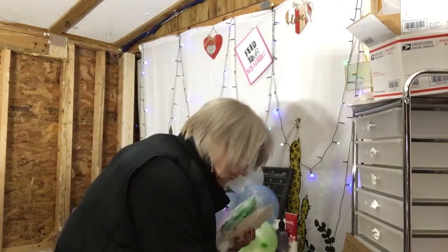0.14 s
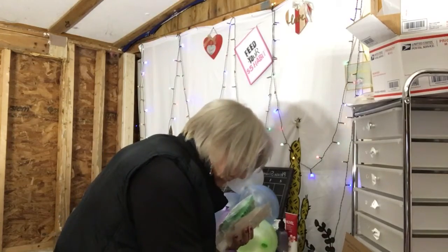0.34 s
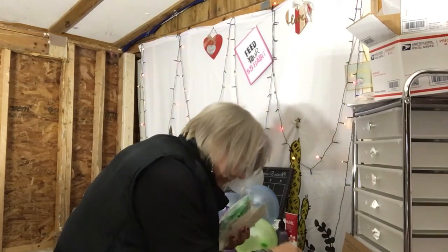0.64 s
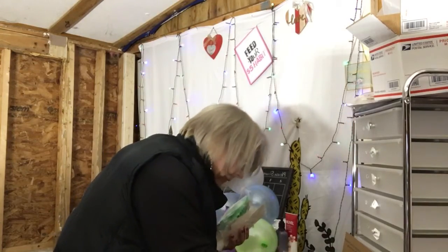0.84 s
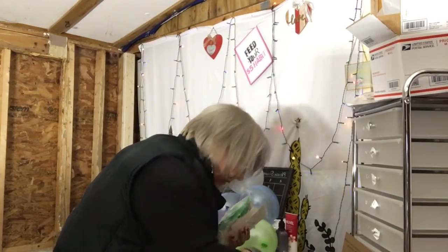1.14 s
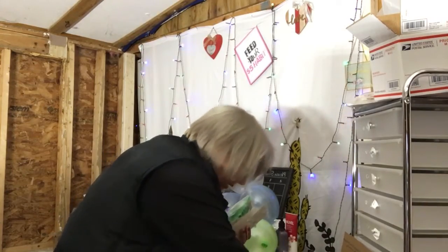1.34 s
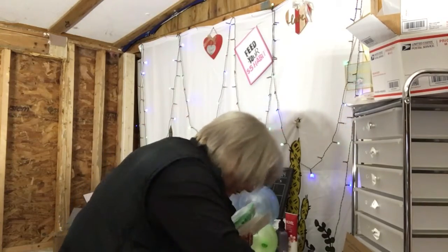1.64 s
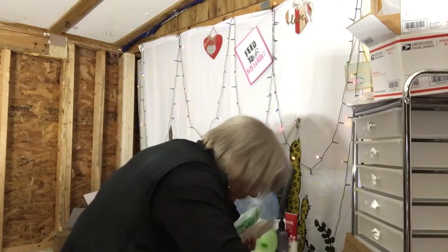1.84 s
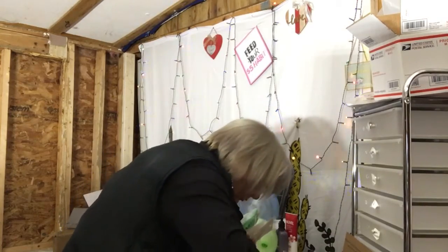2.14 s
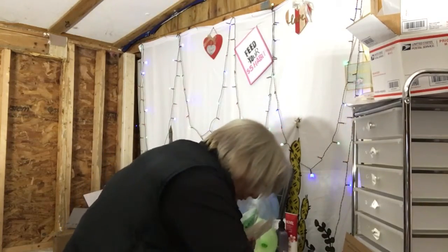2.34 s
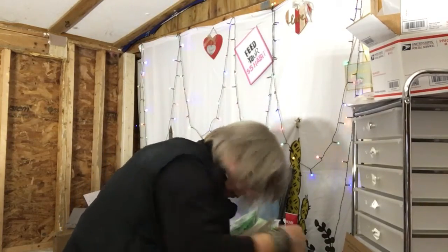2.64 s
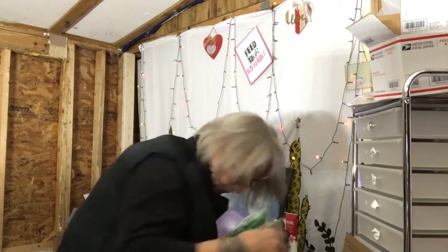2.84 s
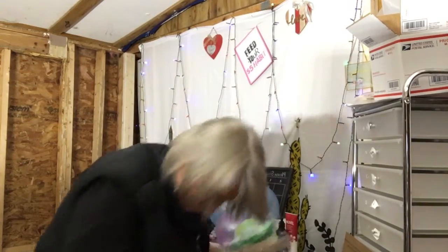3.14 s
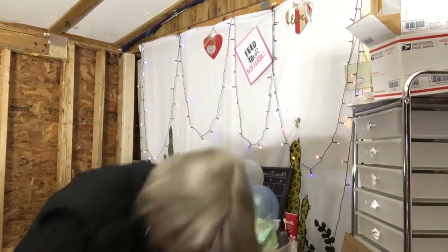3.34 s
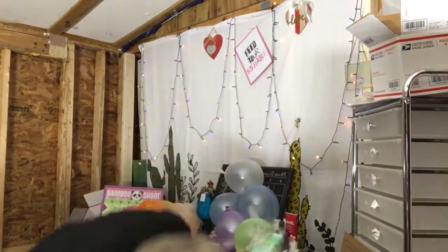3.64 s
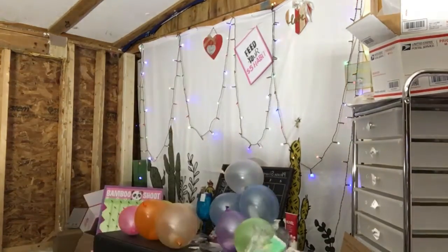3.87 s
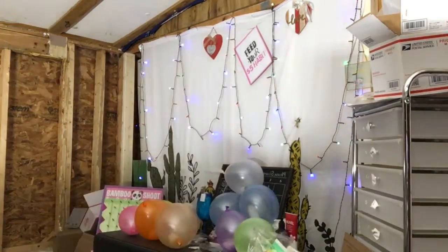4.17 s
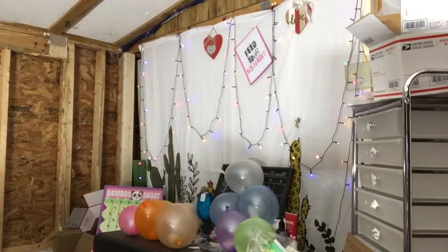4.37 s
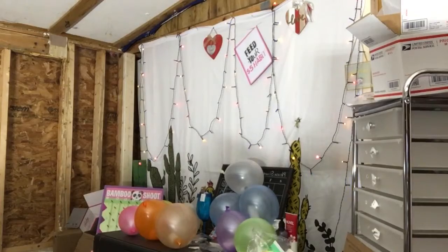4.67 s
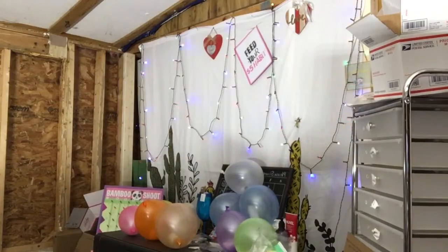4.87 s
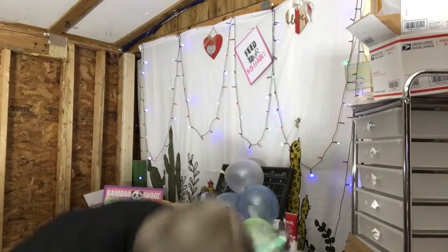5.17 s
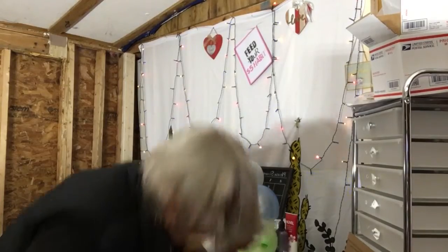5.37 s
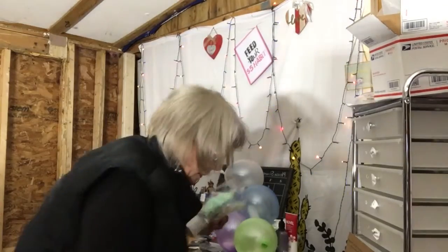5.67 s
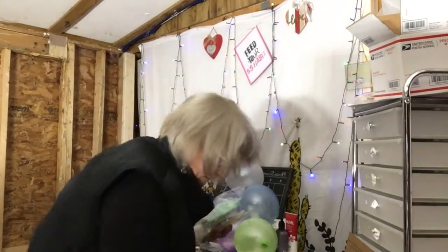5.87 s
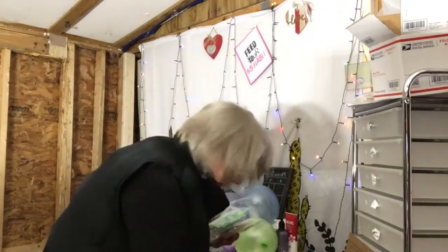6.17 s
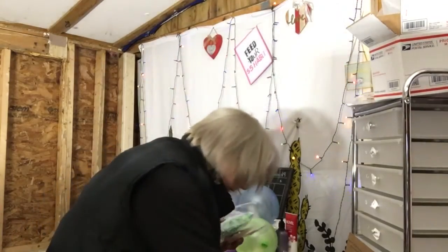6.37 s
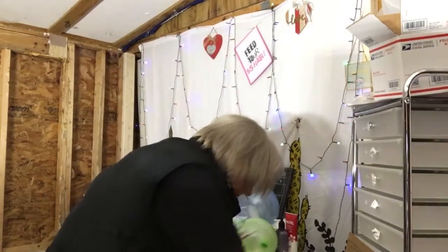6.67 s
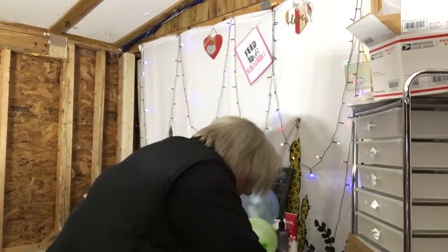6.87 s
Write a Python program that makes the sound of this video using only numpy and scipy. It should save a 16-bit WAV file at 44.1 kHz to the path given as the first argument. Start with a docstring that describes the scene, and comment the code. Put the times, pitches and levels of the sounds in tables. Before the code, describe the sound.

Small plastic packets of hard trinkets are handled on a table. Soft rustles begin, a dull knock and dragging rumble follow, then crisp snapping grows dense and a loud crush lands with clattering beads. It eases to faint creases and a barely audible low hum, picks up with scattered sharp crackles, nearly stops, and resumes vigorously. The miking is close, in a tight, lightly reflective room; bumps reach it through the stand.

```python
"""Small plastic bags crinkle and snap as hands rummage in them on a table in a wooden shed: random creases
drive the film's bright and dull colours. Rumble, a short hum and faint hiss lie beneath, made of filtered
noise and a gliding sine. Bags drop and push the table's modes into a thud; beads and trinkets clack as
clusters of touches ring short partials, and thin metal parts tink on single modes.
Bags, trinkets and tinks get dense, short-lived echoes with a bright wall echo among them."""
import sys
import numpy as np
from scipy import signal
from scipy.fft import rfft, irfft
from scipy.io import wavfile

SR = 44100
rng = np.random.default_rng(int(sys.argv[2]) if len(sys.argv) > 2 else 0)


def to_linear_factor(level_db):
    """Convert decibel levels (scalar or array-like) to linear amplitude factors."""
    exponent = np.asarray(level_db, float) / 20
    return 10 ** exponent


def store_pcm(level_fs):
    """Save levels as 16-bit WAV."""
    pcm = np.round(np.clip(level_fs, -1, 1) * 32767).astype(np.int16)
    wavfile.write(sys.argv[1], SR, np.atleast_2d(pcm).T)


N = 309141  # length in samples

# Strokes of the hands through the bags, and the near-still rests between them.
# Each row: start in seconds, length in seconds, crinkle at the start in dB, crinkle at the end in dB.
STROKES = [(0.0, 0.11, -55.5, -54.5), (.25, 0.15, -46, -41), (.54, 0.29, -65, -67), (.79, 0.022, -63, -61),
           (.87, 0.067, -52.5, -54.5), (1.05, 0.16, -79, -69), (1.29, 0.14, -38.5, -40),
           (1.52, 0.19, -32.5, -41.5), (1.72, 0.36, -53.5, -37.5), (2.05, .13, -55, -34.5),
           (2.22, 0.077, -44, -34.5), (2.36, 0.23, -39.5, -55.5), (2.66, 0.077, -39.5, -45.5),
           (2.88, .08, -41, -41.5), (2.98, 0.18, -57, -45), (3.22, 0.24, -54.5, -64),
           (3.5, .36, -55.5, -49), (3.9, 0.19, -44, -51.5), (4.09, 0.017, -36, -41),
           (4.14, 0.12, -46, -45.5), (4.31, 0.13, -41, -36.5), (4.5, 0.15, -47.5, -46),
           (4.69, 0.038, -60, -43.5), (4.78, 0.11, -43, -49.5), (4.92, 0.49, -53, -61.5),
           (5.53, 0.054, -39, -62), (5.7, 0.083, -51, -51), (5.93, 0.37, -38, -34.5),
           (6.3, 0.18, -34.5, -36), (6.5, 0.11, -53, -49.5), (6.68, .08, -69, -64),
           (6.8, 0.12, -48.5, -36.5), (6.94, 0.08, -41.5, -32.5)]
STROKE_RISE_DB_PER_S, STROKE_FALL_DB_PER_S = 361, 250.0
# The harder the stroke, the brighter: dull body relative to a -50 dB crinkle, and its change per dB.
BODY_DB, BODY_SLOPE = -6, -0.27

# Sudden grips that crush a bag.
# Each row: start in seconds, crinkle in dB, duller body relative to it in dB, dying time t60 in seconds.
GRIPS = [(0.1, -44, -24, .17), (0.1746, -37.5, -12, .086), (0.23, -35.5, -15, 0.23),
         (.285, -47.5, -3, 0.064), (.345, -39.5, -15, 0.23), (0.498, -49, -20, 0.21),
         (0.758, -43, -10, 0.17), (1.212, -42.5, -11, 1), (1.31, -33.5, -29, 0.13), (1.328, -43, -2, 0.3),
         (1.538, -38, -21, .097), (1.82, -50, -18, .13), (1.872, -41, -28, .13), (1.9769, -42, -22, 0.15),
         (2.043, -36, -4.5, 0.046), (2.358, -45, -24, 0.15), (2.6089, -21, -12, 0.12),
         (2.8383, -28.5, -16, 0.1), (2.893, -35.5, -5, 0.15), (2.951, -44.5, -6, .13),
         (3.04, -46, 2.5, 0.26), (3.1, -34, -5, 0.092), (3.198, -37, -10, 0.094), (3.409, -55.5, 5.5, 0.16),
         (4.073, -47, -12, .13), (4.199, -40, -7.5, 0.13), (4.337, -46, -9, 0.15),
         (4.452, -30.5, -33, 0.38), (4.5094, -38, -11, 0.1), (4.61, -33, -35, 0.091),
         (4.669, -34.5, -16.5, 0.15), (4.72, -33, -24, 0.17), (4.89, -55, -34, 0.16), (5.101, -58, 4, 0.43),
         (5.472, -34, -9, 0.45), (5.5418, -36, -11, 0.16), (5.642, -47.5, -0.5, 0.22), (5.68, -34, -9, .1),
         (5.776, -49, -17, .13), (5.86, -45.5, -7, 0.38), (5.916, -45, -2, 0.082),
         (6.056, -31.5, -15, 0.058), (6.165, -35.5, -27, .1), (6.206, -33, -17, .08),
         (6.274, -28.5, -12.5, 0.031), (6.582, -52.5, -1, .13), (6.7548, -36.5, -9, 0.44),
         (6.91, -43, -6, .13)]
GRIP_RISE_S, GRIP_HOLD_S = 0.0051, 0.011

# The clearest single creases that snap. Each row: start in seconds, strength in dB.
SNAPS = [(.0181, -16), (.0356, -19), (.095, -25), (.0992, -10.5), (.1784, -16), (.2092, -16), (.2491, -10),
         (.2535, -12), (.4996, -24), (.5054, -17.5), (.7991, -18), (1.3104, -11), (1.829, -15.5),
         (1.9334, -9), (2.0456, -11), (2.119, -8), (2.1702, -11), (2.218, -11.5), (2.3227, -5),
         (2.3647, -3), (2.3813, -8.5), (2.403, -13), (2.4542, -9.5), (2.6194, -3), (2.8408, -18),
         (3.4339, -25), (3.4937, -24), (3.5525, -20), (3.7498, -25), (3.826, -31), (3.84, -21),
         (3.8786, -17.5), (3.894, -22), (3.966, -16), (4.198, -9), (4.89, -20), (4.895, -13), (5.0974, -20),
         (5.4717, -10), (5.5426, -10), (5.5648, -6), (5.6924, -7), (5.8672, -15.5), (5.9203, -10),
         (6.0032, -7), (6.07, -6), (6.091, -5.5), (6.1636, -4), (6.2119, -4), (6.2901, -19), (6.384, -12),
         (6.549, -14), (6.5896, -16), (6.804, -6), (6.9195, -10)]
SNAP_BODY_DB = -25.5  # relative to the snap
# Lesser snaps come at random: how often, strength above the stroke's crinkle, spread.
STRAY_SNAPS_PER_S, STRAY_SNAP_DB, STRAY_SPREAD_DB = 25.0, 17, 6.5

# Creases of different size favour different pitches. Each entry: pitch in Hz.
EDGE_TINTS_HZ = [6100, 6600, 9200, 8900, 10800, 10500, 13400, 13300, 14400, 15100]
BODY_TINTS_HZ = [830, 1180, 1280, 1880, 2390, 2940, 3000, 3700, 4650, 5850, 6140]
# Colour of the film's bright edge. Each row: frequency in Hz, relative level in dB per Hz.
FILM_EDGE = [(2350, -48), (4000, -16), (7640, -13.5), (8810, -6.5), (10100, -5.5), (11300, 4),
             (12100, -0.5), (15700, -20)]
# Colour of the film's duller body. Each row: frequency in Hz, relative level in dB per Hz.
FILM_BODY = [(240, -0.5), (400, -4), (817, -5), (926, -3), (1010, 0), (1090, 0), (2280, 2), (4670, 1.5),
             (8000, -1), (10400, 6.5), (17600, -120)]

# Bags and arms dragged over the table make it rumble.
# Each row: start in seconds, length in seconds, level at the start in dB, level at the end in dB.
DRAGS = [(0.0, .45, -68, -62), (1.34, 0.27, -45.5, -54), (1.62, 0.13, -49, -59), (1.9, 0.6, -56, -64.5),
         (3.71, 0.63, -50.5, -54.5), (5.0, 0.29, -65, -58.5), (6.02, 0.44, -64, -52),
         (6.8, 0.31, -45.5, -54.5)]
DRAG_RISE_DB_PER_S, DRAG_FALL_DB_PER_S, TABLE_REST_DB = 250.0, 133, -71.5
# Colour of the table rumble. Each row: frequency in Hz, relative level in dB per Hz.
RUMBLE = [(53, -8), (90, -28), (102, -24), (119, -35), (135, 4.5), (179, 2), (284, -4), (361, 3), (452, -4),
          (480, -5.5), (700, -8), (910, -12), (1540, -120)]
# Weight comes down on the floor boards.
# Each row: start in seconds, length in seconds, level at the start in dB, level at the end in dB.
TREADS = [(.45, .12, -65, -70), (1.34, .1, -64, -60), (2.92, .02, -58, -62), (3.21, 0.04, -49, -54.5),
          (3.7, .65, -71, -61), (5.2, .03, -68, -63), (6.42, 0.14, -49, -51.5)]
TREAD_RISE_DB_PER_S, TREAD_FALL_DB_PER_S, FLOOR_REST_DB = 200.0, 120.0, -75
# Something slides over the table and hums, its pitch rising.
SLIDE_S, SLIDE_LENGTH_S, SLIDE_START_HZ, SLIDE_END_HZ, SLIDE_DB = 3.74, 0.265, 177, 186.6, -54.5

# Colour of the room hiss. Each row: frequency in Hz, relative level in dB per Hz.
HISS = [(18, -36), (30, -51), (121, 5), (252, -12), (295, 14), (336, -16), (449, -51), (616, -3), (702, -7),
        (1540, -5.5), (7090, -43), (11400, -10), (16000, -24)]
HISS_DB = -69

SHED_T60_S, SHED_DB, WALL_CUT_HZ = 0.32, -9, 16600
WALL_ECHO_S, WALL_ECHO_DB = 0.0054, -7

# Blows on the table.
# Each row: start in seconds, strength in dB, extra on the deep modes in dB, extra on the upper modes in dB.
THUDS = [(0.237, -67, -29, 17), (1.216, -25.5, -27, -13), (1.244, -38, -30, -15), (1.337, -33.5, -17, -11),
         (1.381, -44, -9, 1.5), (2.172, -38.5, -14, -4.5), (2.61, -37, -14, -35), (2.85, -56, -40, 5),
         (2.918, -45, -14, -20), (3.147, -41.5, -20, -24), (3.22, -51.5, 0, -13), (3.434, -54, -26, 17),
         (3.593, -51.5, -17, 5), (3.703, -44, -31, -15), (3.759, -56, -27, 10), (3.9, -35, -33, -14),
         (4.019, -37.5, -35, -10), (4.09, -45, -34, 2.5), (4.267, -43, -26, -27), (4.488, -50.5, -19, -23),
         (5.54, -47.5, -32, -26), (5.861, -55, -3, -1), (6, -46.5, -32, -5), (6.303, -38, -22, -3.5),
         (6.339, -39.5, -14, -19), (6.435, -34, -1, -11), (6.459, -46.5, 6, -6), (6.765, -36.5, -11, 0),
         (6.897, -41.5, -28, -17)]
# Modes of table top and floor. Each row: frequency in Hz, relative level in dB, t60 in seconds.
TABLE_MODES = [(46.5, 2, 0.56), (71.7, 4, 0.19), (133.6, 1.5, 0.29), (202, -0.5, 0.12), (260.3, 0, 0.14),
               (325, 8, 0.05), (368.3, -0.5, 0.19), (465, -36, 0.048), (600, -10, 0.17), (784, -9.5, 0.072),
               (1130, -6, 0.12)]
CONTACT_S = 0.0048

# Hard pieces that clack. Each row: start in seconds, first touch in dB, nominal pitch in Hz,
# clatter after it relative to the touch in dB, t60 of the clatter in seconds.
CLACKS = [(.292, -54, 2930, -17, .066), (1.21, -46.5, 604, -2, 0.021), (1.339, -57, 1200, 12, 0.066),
          (2.055, -55, 1890, 2, 0.11), (2.171, -30.5, 2460, -3.5, 0.072), (2.613, -33.5, 2620, -1.5, 0.072),
          (2.617, -38, 3350, -15, 0.11), (2.716, -32, 5300, -12, .04), (2.850, -40.5, 2430, -5, 0.083),
          (2.894, -45, 5250, -3, 0.13), (2.969, -48.5, 2460, 2, 0.13), (3.051, -56, 1260, -5, 0.34),
          (3.106, -45.5, 2800, 0, 0.07), (3.207, -45, 2550, 4, 0.025), (3.421, -49.5, 573, -6.5, 0.23),
          (3.426, -57.5, 1850, 0, 0.14), (3.893, -31, 1490, -12, 0.13), (3.94, -60.5, 770, 6, .28),
          (4.093, -55, 1940, 0.5, 0.2), (4.16, -43.5, 4400, -1, 0.062), (4.461, -40.5, 3000, -3, 0.17),
          (5.549, -39.5, 3700, -6.5, 0.059), (5.997, -45.5, 4300, 2, .06), (6.291, -57, 607, -8, 0.048),
          (6.382, -50, 3000, -8, .06), (6.565, -53, 3740, 3, .051), (6.763, -58, 420, 3, .05)]
# Partials of a hard piece, before chance and contact damping.
# Each row: multiple of the pitch, relative level in dB, t60 in cycles of ringing.
CLACK_PARTIALS = [(.5, -43, 15), (.7, -46, 12), (.87, -32, 14), (1.002, 1.6, 74), (1.13, -3, 16),
                  (1.26, 3.5, 33), (1.5, -5.5, 50), (1.8, -0.5, 18), (2.3, -1, 32)]
CLATTER_RISE_CYCLES = 8.9  # big, low pieces gather their clatter more slowly

# Thin metal parts that ring on a single pitch.
# Each row: start in seconds, peak in dB, frequency in Hz, t60 in seconds.
TINKS = [(1.884, -26.5, 9950, 0.053), (1.905, -40, 9800, .06), (2.17, -41, 2970, 0.15),
         (2.218, -27, 8900, 0.016), (2.62, -21.5, 5200, 0.025), (2.621, -27, 6150, 0.037)]

LOW_CUT_HZ, TOP_HZ = 60.3, 15950


def rms_one(x):
    """Scale to rms 1."""
    return x / np.sqrt(np.mean(x ** 2) + 1e-20)


def add(out, s, sound):
    """Mix a short sound in at time s."""
    at = max(round(s * SR), 0)
    out[at:at + len(sound)] += sound[:N - at]


def colour(x, spectrum):
    """Causal (minimum-phase) filter with the given spectrum; white noise of rms 1 stays rms 1."""
    hz, level_db = np.transpose(spectrum)
    grid = np.fft.rfftfreq(4096, 1 / SR) + 1  # 1 Hz up, so that the log exists
    cepstrum = irfft(np.log(to_linear_factor(np.interp(np.log(grid), np.log(hz), level_db))))
    # folding the cepstrum forward in time makes the phase minimal
    cepstrum[1:2048] *= 2
    cepstrum[2049:] = 0
    response = irfft(np.exp(rfft(cepstrum)))
    return signal.fftconvolve(x, response / np.sqrt(np.sum(response ** 2)))[:N]


def drift(rate):
    """Slow chance of spread 1: noise through two equal poles at rate Hz, drawn every 40 samples."""
    pole = np.exp(-2 * np.pi * rate * 40 / SR)
    noise = rng.standard_normal(N // 40 + 2002)
    slow = signal.lfilter([1], [1, -2 * pole, pole * pole], noise)[2000:]  # settled part
    return np.interp(np.arange(N) / 40, np.arange(len(slow)), rms_one(slow))


def ring(clicks, hz, t60):
    """Two-pole resonator: a unit click sets a dying sine of initial height 1 ringing."""
    radius = to_linear_factor(-60 / (max(t60, 0.002) * SR))
    angle = 2 * np.pi * hz / SR
    feedback = [1, -2 * radius * np.cos(angle), radius * radius]
    return signal.lfilter([0, np.sin(angle)], feedback, clicks + 1e-18)


def spells(rows, rise_db_per_s, fall_db_per_s):
    """Summed power of spells that swell in, glide from one level to another and fade out."""
    t, power = np.arange(N) / SR, np.full(N, 1e-16)
    for s, length_s, start_db, end_db in rows:
        end_s = s + max(length_s, 0.001)
        edges_db = rise_db_per_s * np.maximum(s - t, 0) + fall_db_per_s * np.maximum(t - end_s, 0)
        glide_db = np.interp(t, [s, end_s], [start_db, end_db])
        power += to_linear_factor(2 * (glide_db - edges_db))
    return power


def creases(per_s, spread_db, clump_db):
    """Creases of the film give way at random, in clumps, with exponential spread in dB; rms 1."""
    sizes = to_linear_factor(spread_db * np.minimum(rng.exponential(1, N), 5))
    signs = rng.choice([-1, 1], N)
    born = rng.random(N) < per_s * to_linear_factor(clump_db * drift(40.0)) / SR
    return rms_one(sizes * signs * born)


def tinted(clicks, tints_hz, lift_db, cycles, per_s):
    """Each crease adds a short ring of its own; neighbours in time share a pitch for a moment; rms kept."""
    turns = np.cumsum(rng.random(N) < per_s / SR)
    dealt = rng.integers(0, len(tints_hz), N)[turns]
    rings = np.zeros(N)
    for k, hz in enumerate(tints_hz):
        rings += ring(clicks * (dealt == k), hz, cycles / hz) * np.sqrt(hz / SR)
    out = clicks + to_linear_factor(lift_db) * rings
    return out * np.sqrt(np.mean(clicks ** 2) / np.mean(out ** 2))


def bags():
    """Strokes, grips and snaps release creases, each with a bright edge and a duller body of the film."""
    bright_power = spells(STROKES, STROKE_RISE_DB_PER_S, STROKE_FALL_DB_PER_S)
    stroke_db = 10 * np.log10(bright_power)
    dull_power = bright_power * to_linear_factor(2 * (BODY_DB + BODY_SLOPE * (stroke_db + 50)))
    t = np.arange(SR // 2) / SR
    for s, grip_db, grip_body_db, t60 in GRIPS:
        dying_db = -60 * np.maximum(t - GRIP_RISE_S - GRIP_HOLD_S, 0) / max(t60, 0.01)
        shape = to_linear_factor(2 * (grip_db + dying_db)) * np.minimum(t / GRIP_RISE_S, 1) ** 2
        add(bright_power, s, shape)
        add(dull_power, s, shape * to_linear_factor(2 * grip_body_db))

    film = creases(per_s=3500.0, spread_db=-1.5, clump_db=4.0)
    body_only = creases(per_s=3000.0, spread_db=1.5, clump_db=3.5)
    bright = np.sqrt(bright_power) * film
    dull = np.sqrt(dull_power) * rms_one(film + 1.33 * body_only)
    bright = tinted(bright, EDGE_TINTS_HZ, lift_db=-6.0, cycles=7.0, per_s=2400.0)
    dull = tinted(dull, BODY_TINTS_HZ, lift_db=-3.5, cycles=8.5, per_s=900.0)

    snaps = list(SNAPS)
    for k in np.flatnonzero(rng.random(N) < STRAY_SNAPS_PER_S / SR):
        stray_db = stroke_db[k] + STRAY_SNAP_DB + STRAY_SPREAD_DB * rng.standard_normal()
        snaps.append((k / SR, stray_db))
    for s, snap_db in snaps:
        # a crease lets go in a few quick steps
        tear = rng.standard_normal(6) * to_linear_factor(-3.0 * np.arange(6))
        tear = tear / np.sqrt(np.sum(tear ** 2))
        add(bright, s, tear * to_linear_factor(snap_db))
        add(dull, s, np.sign(tear[:1]) * to_linear_factor(snap_db + SNAP_BODY_DB))
    return colour(bright, FILM_EDGE) + colour(dull, FILM_BODY)


def shifting():
    """Drags and treads swell filtered noise into rumble in table and floor; a slide hums as a rising sine."""
    dragged = np.sqrt(spells(DRAGS, DRAG_RISE_DB_PER_S, DRAG_FALL_DB_PER_S) + to_linear_factor(2 * TABLE_REST_DB))
    trodden = np.sqrt(spells(TREADS, TREAD_RISE_DB_PER_S, TREAD_FALL_DB_PER_S) + to_linear_factor(2 * FLOOR_REST_DB))
    lumps = to_linear_factor(3.44 * drift(7.2))
    table_top = colour(rng.standard_normal(N), RUMBLE) * dragged * lumps
    floor_band = signal.butter(2, [38.0, 95.0], "band", fs=SR, output="sos")
    boards = rms_one(signal.sosfilt(floor_band, rng.standard_normal(N))) * trodden

    along = (np.arange(N) / SR - SLIDE_S) / SLIDE_LENGTH_S  # 0 to 1 over the slide
    hz = np.interp(along, [0, 1], [SLIDE_START_HZ, SLIDE_END_HZ])
    sounding = np.interp(along, [-0.07, 0, 1, 1.07], [0, 1, 1, 0])
    hum_level = np.sqrt(2) * to_linear_factor(SLIDE_DB + 2.2 * drift(8.2)) * sounding
    hum = hum_level * np.sin(2 * np.pi * np.cumsum(hz) / SR)
    return table_top + boards + hum


def room_hiss():
    """Steady white noise, coloured."""
    return to_linear_factor(HISS_DB) * colour(rng.standard_normal(N), HISS)


def shed(x, count=90):
    """Dense dying echoes, a bright smeared wall echo standing out early; they change as the hands move."""
    out, t = np.zeros(N), np.arange(SR // 3) / SR
    places = np.linspace(0, count - 1, N)
    hard_wall = signal.butter(2, 5000.0, "high", fs=SR, output="sos")
    for k in range(count):
        tail = rng.standard_normal(len(t)) * to_linear_factor(-60 * t / SHED_T60_S)
        tail *= np.clip((t - 0.003) / 0.0018, 0, 1)
        echo_s = WALL_ECHO_S + rng.normal(0, 0.0003)
        wall = rng.standard_normal(len(t)) * np.exp(-((t - echo_s) / 0.0004) ** 2)
        wall = signal.sosfilt(hard_wall, wall)
        echoes = to_linear_factor(SHED_DB) * tail / np.sqrt(np.sum(tail ** 2))
        echoes += to_linear_factor(WALL_ECHO_DB) * wall / np.sqrt(np.sum(wall ** 2))
        # crossfade from each pattern to the next
        here = np.flatnonzero(np.abs(places - k) < 1)
        faded = x[here] * np.cos(np.pi / 2 * (places[here] - k))
        add(out, here[0] / SR, signal.fftconvolve(faded, echoes))
    return signal.sosfilt(signal.butter(1, WALL_CUT_HZ, fs=SR, output="sos"), out)


def table():
    """Every blow pushes all modes; heavy blows reach the floor, hard ones the upper modes."""
    out = np.zeros(N)
    strengths = rng.normal(0, 1.2, (len(THUDS), len(TABLE_MODES)))
    steps = np.arange(int(CONTACT_S * SR))
    for k, (hz, level_db, t60) in enumerate(TABLE_MODES):
        deep = np.interp(np.log(hz), np.log([80, 130]), [1, 0])
        hard = np.interp(np.log(hz), np.log([220, 450]), [0, 1])
        # the mode builds up during contact
        swing = np.hanning(len(steps)) * np.sin(2 * np.pi * hz * steps / SR + 1)
        swing = swing / np.sum(np.abs(swing))
        pushes = np.zeros(N)
        for (s, blow_db, deep_db, hard_db), strength_db in zip(THUDS, strengths[:, k]):
            mode_db = blow_db + level_db + deep * deep_db + hard * hard_db + strength_db
            add(pushes, s, to_linear_factor(mode_db) * swing)
        out += ring(pushes, hz, t60)
    return out


def trinkets():
    """A clack is one sharp touch and a clatter of further ones; all strike the piece's short partials."""
    out, t = np.zeros(N), np.arange(SR // 4) / SR
    for s, touch_db, hz, clatter_db, t60 in CLACKS:
        rise_s = CLATTER_RISE_CYCLES / hz
        swell = np.minimum(t / rise_s, 1) * to_linear_factor(-60 * np.maximum(t - rise_s, 0) / max(t60, 0.01))
        struck = rng.random(len(t)) < 1500.0 / SR  # 1500 touches per second
        touches = rng.standard_normal(len(t)) * struck * swell * to_linear_factor(clatter_db)
        touches[0] = 1
        damping = 1.1 + rise_s / 0.0057  # a slow, dragging contact stifles the ring
        chance = rng.normal(0, 1, (len(CLACK_PARTIALS), 2))
        for (multiple, level_db, cycles), (detune, strength) in zip(CLACK_PARTIALS, chance):
            partial_hz = min(hz * multiple * (1 + 0.042 * detune), 15000)
            partial_db = touch_db + level_db + 1.74 * strength
            ringing = ring(touches, partial_hz, cycles / partial_hz / damping)
            add(out, s, to_linear_factor(partial_db) * ringing)
    return out


def tinks():
    """Each touch on thin metal rings a single dying mode."""
    out, click = np.zeros(N), np.r_[1, np.zeros(SR // 2)]
    for s, peak_db, hz, t60 in TINKS:
        add(out, s, to_linear_factor(peak_db) * ring(click, hz, t60))
    return out


def scene():
    """Bags, trinkets and tinks sound in the room; table and rumble come through the stand, without echo."""
    air = bags() + trinkets() + tinks()
    through_stand = table() + shifting()
    return (air + shed(air) + through_stand + room_hiss())[None]


def band_limit(x):
    """A steep low-pass at the top of the band."""
    return signal.sosfilt(signal.butter(12, 16810, fs=SR, output="sos"), x)


def record(dry):
    """The microphone loses the deep bass, and the top is cut steeply."""
    bass_cut = signal.butter(4, LOW_CUT_HZ, "high", fs=SR, output="sos")
    top_cut = signal.ellip(8, 0.5, 24, TOP_HZ, fs=SR, output="sos")
    mix = signal.sosfilt(top_cut, signal.sosfilt(bass_cut, dry))
    return band_limit(mix)


dry = scene()
out = record(dry)
store_pcm(out)
```